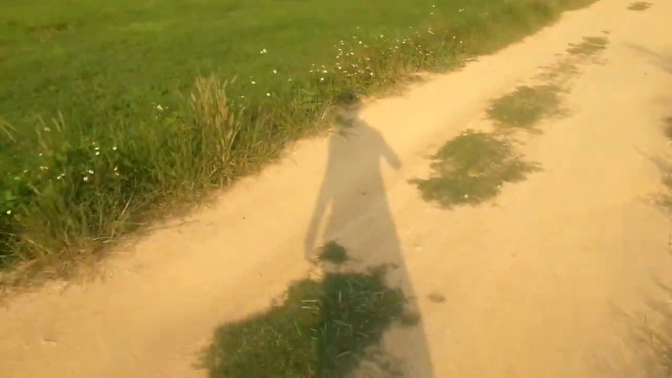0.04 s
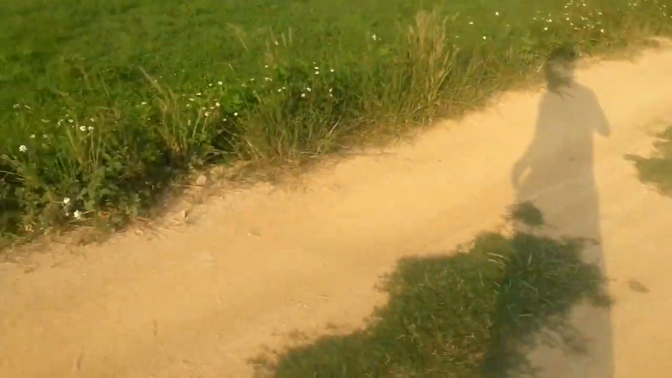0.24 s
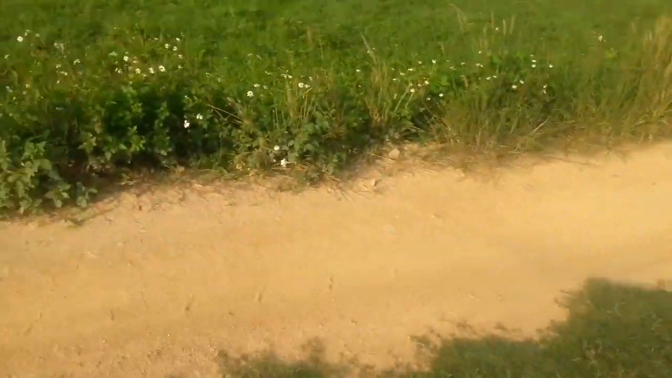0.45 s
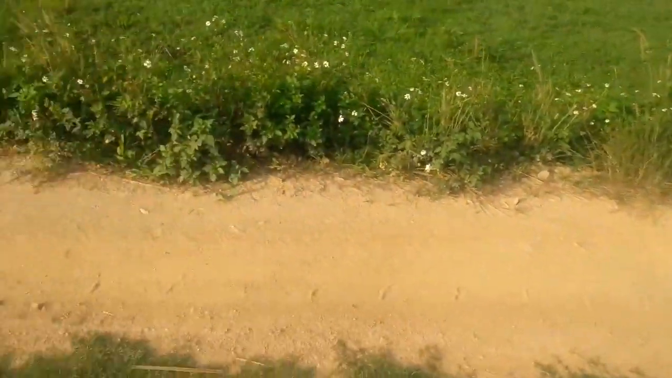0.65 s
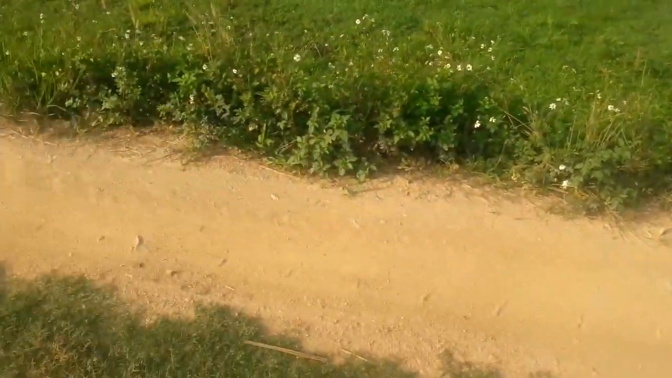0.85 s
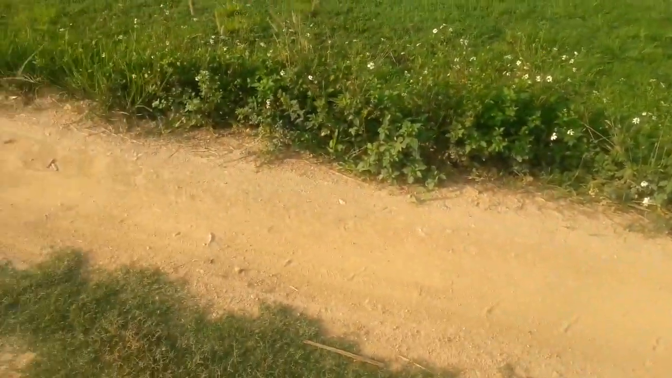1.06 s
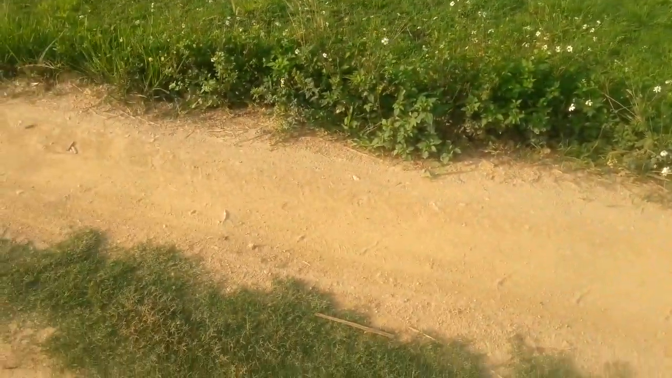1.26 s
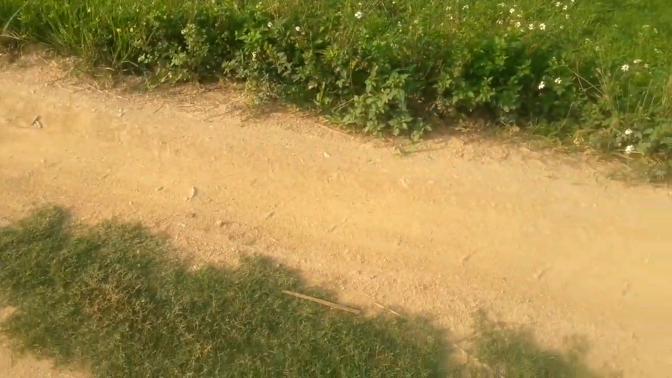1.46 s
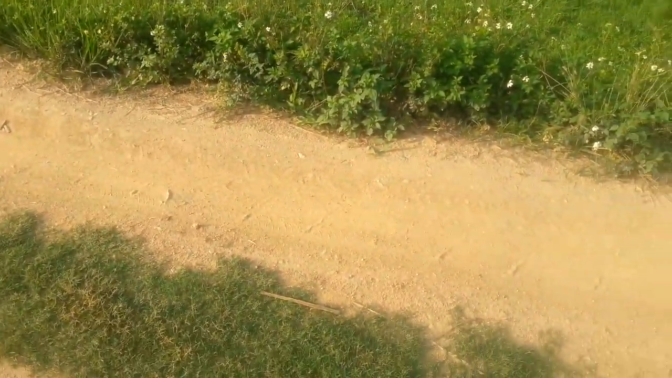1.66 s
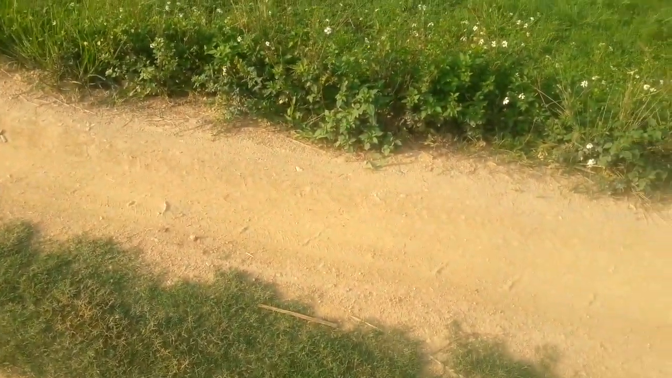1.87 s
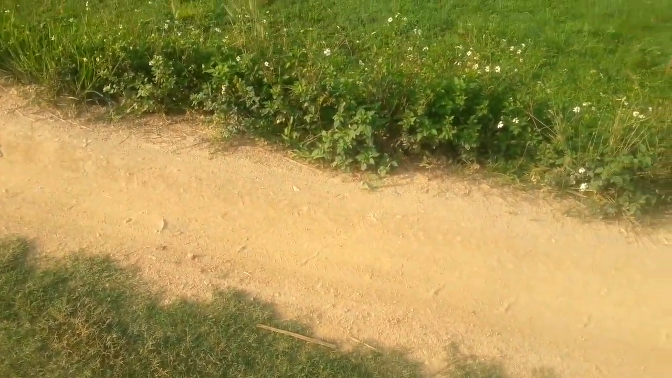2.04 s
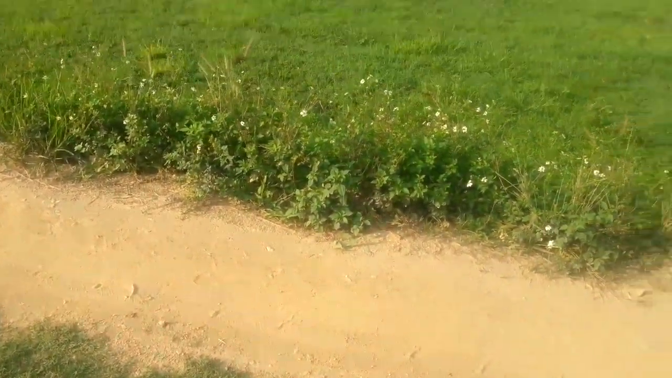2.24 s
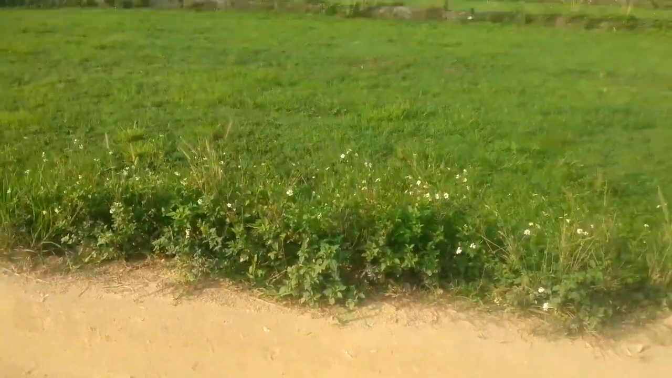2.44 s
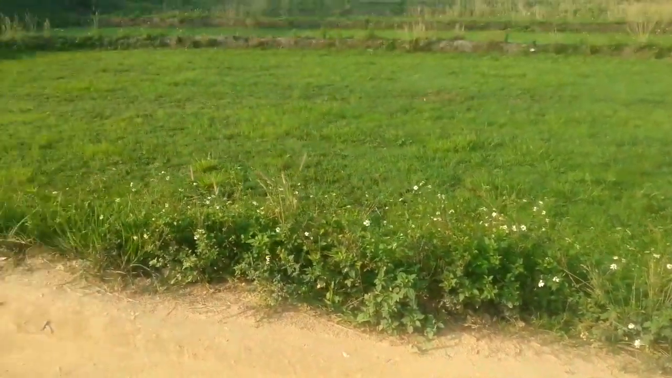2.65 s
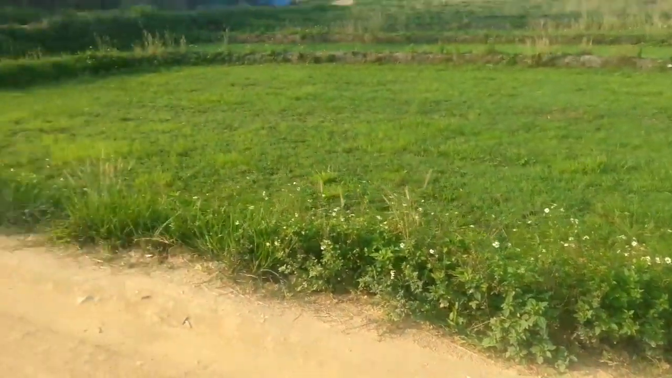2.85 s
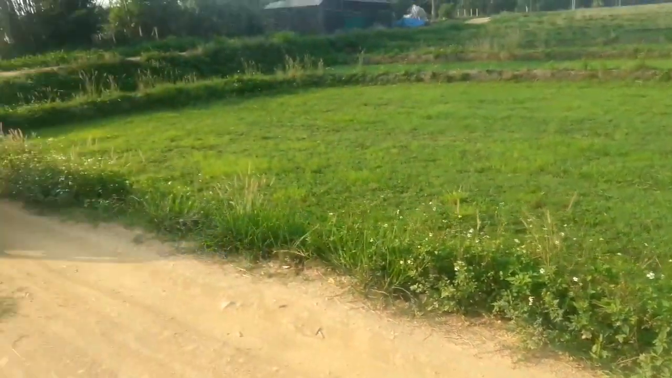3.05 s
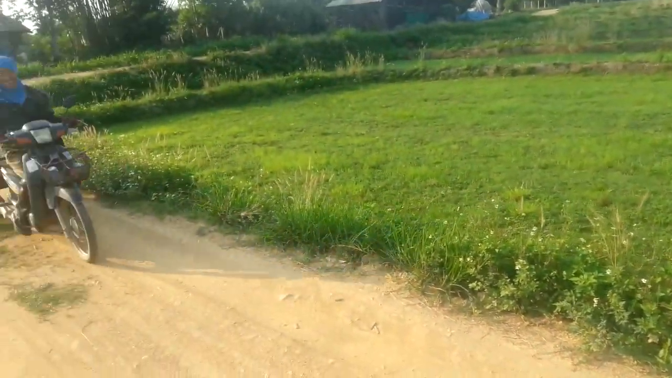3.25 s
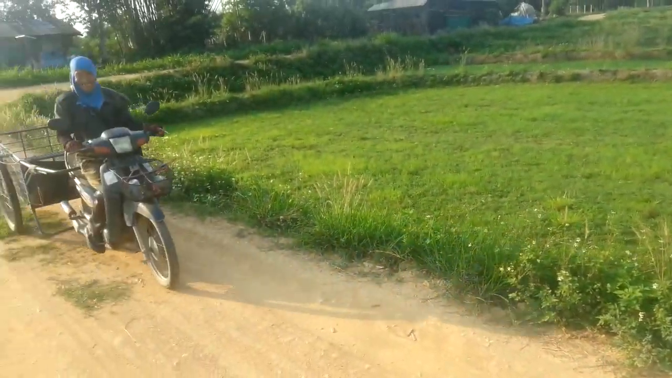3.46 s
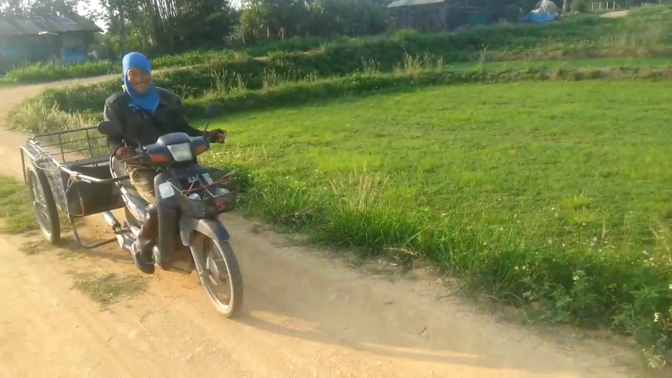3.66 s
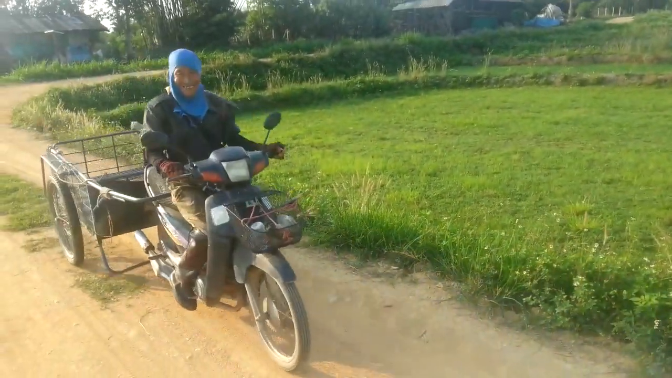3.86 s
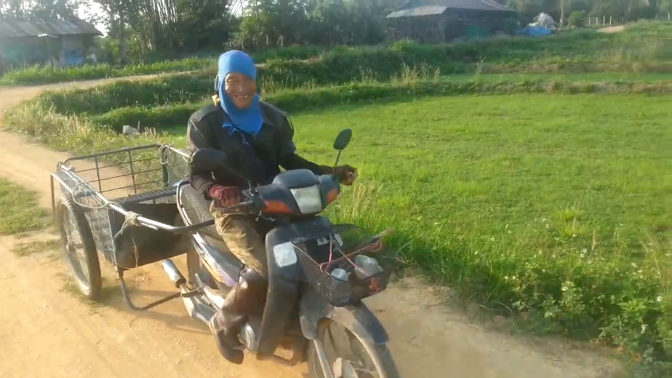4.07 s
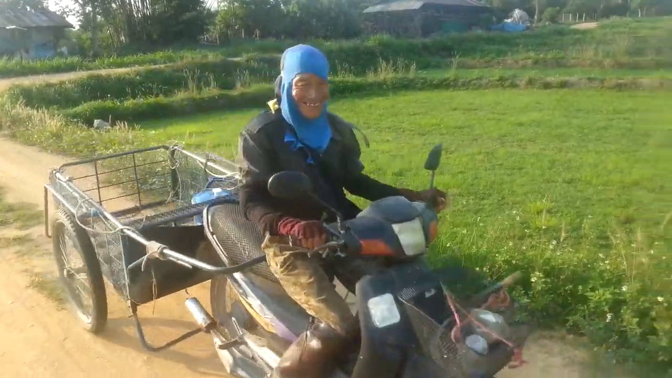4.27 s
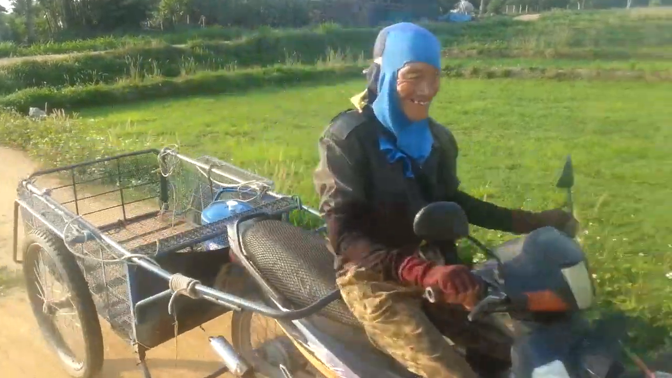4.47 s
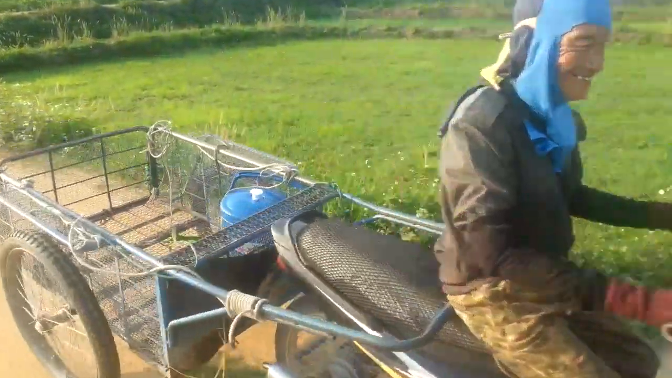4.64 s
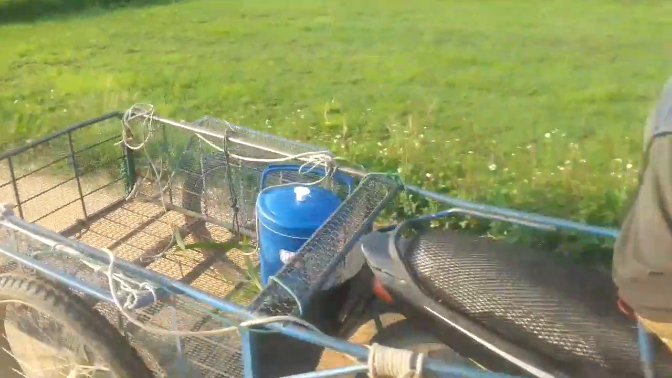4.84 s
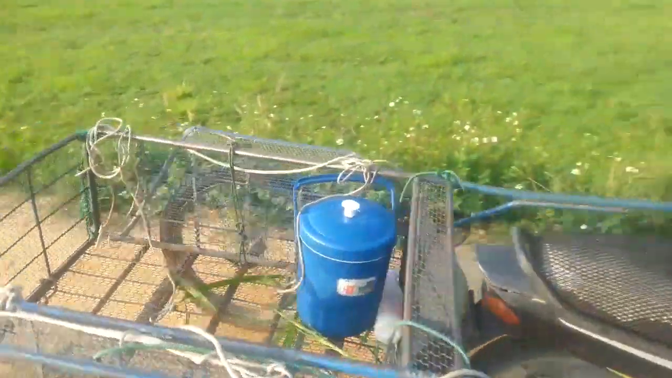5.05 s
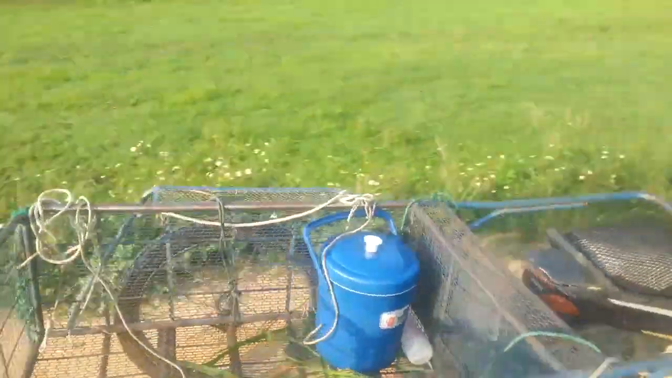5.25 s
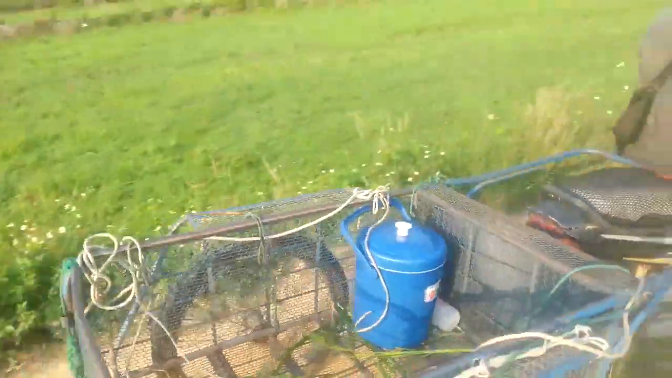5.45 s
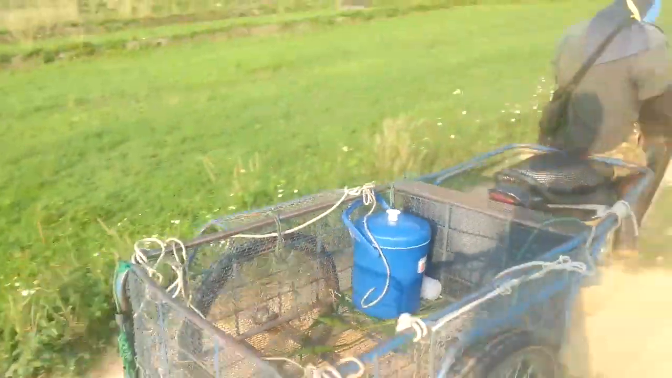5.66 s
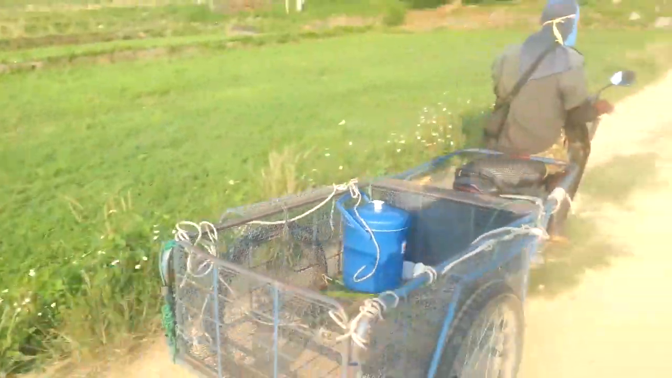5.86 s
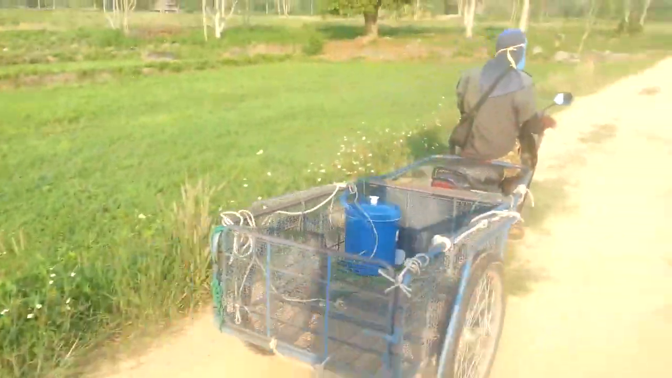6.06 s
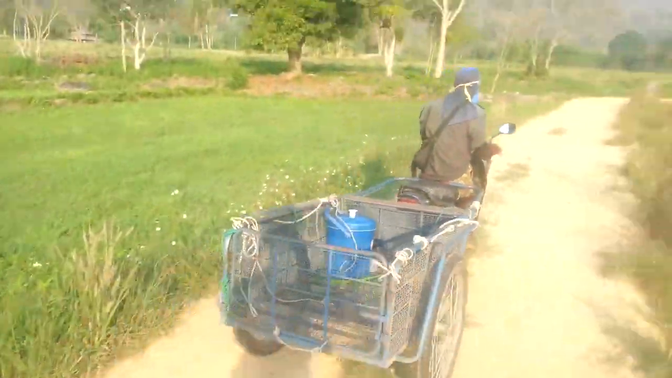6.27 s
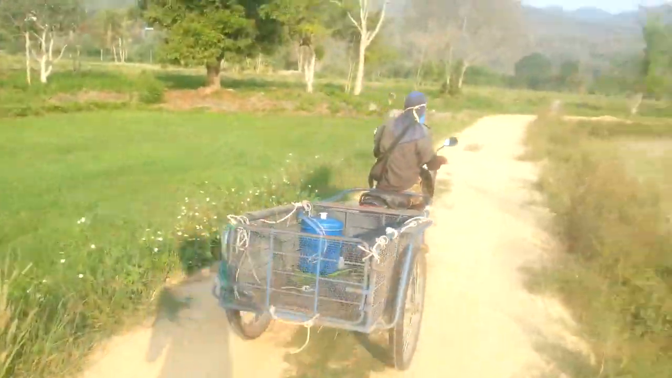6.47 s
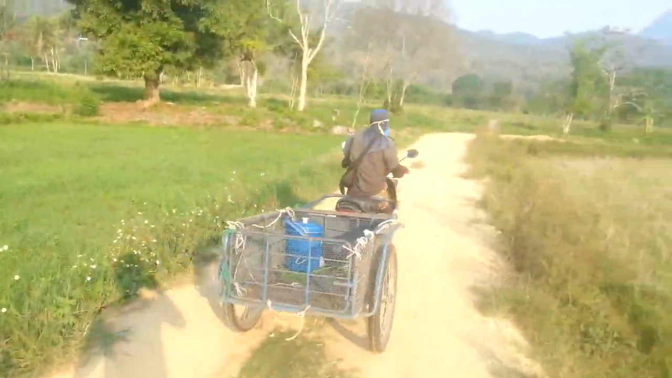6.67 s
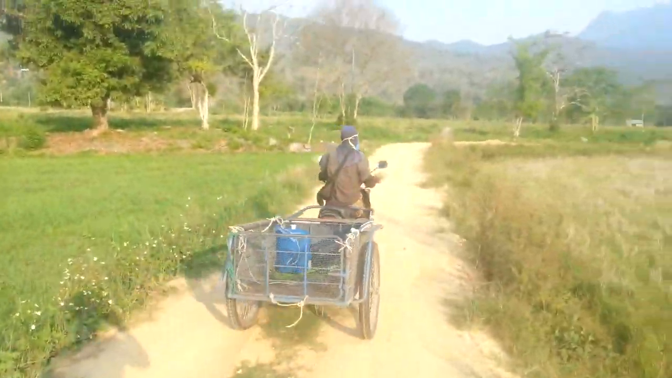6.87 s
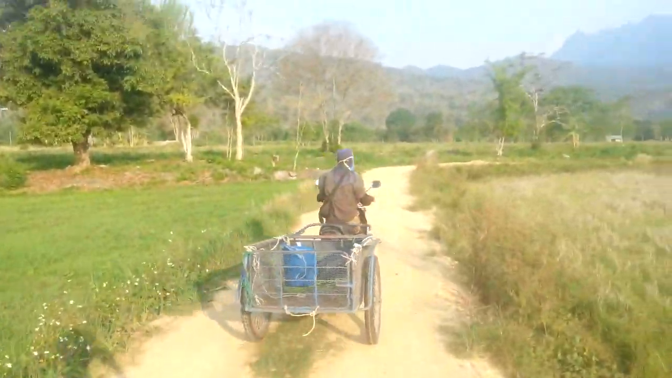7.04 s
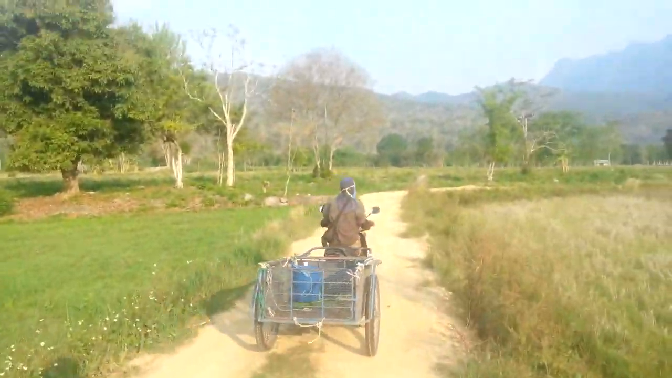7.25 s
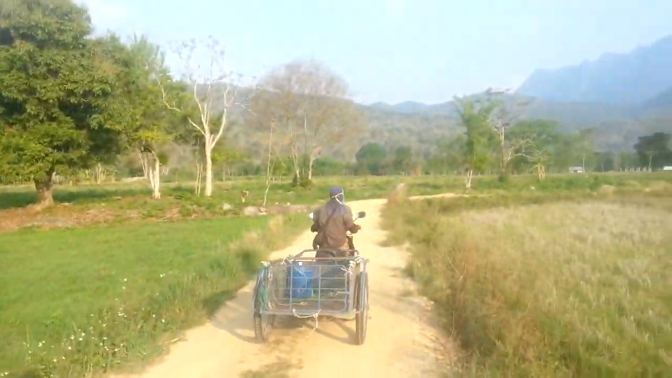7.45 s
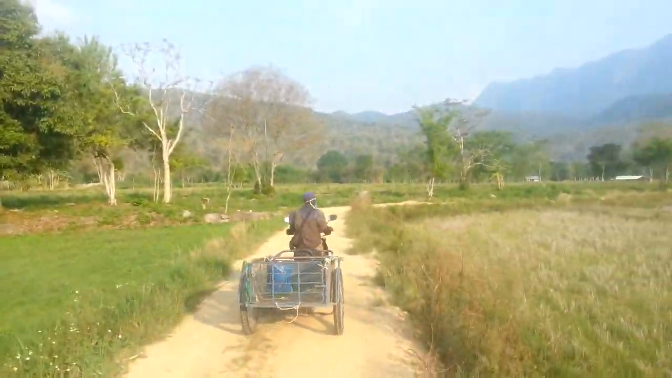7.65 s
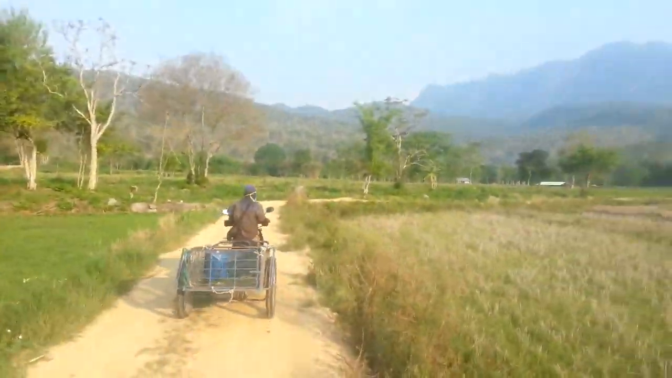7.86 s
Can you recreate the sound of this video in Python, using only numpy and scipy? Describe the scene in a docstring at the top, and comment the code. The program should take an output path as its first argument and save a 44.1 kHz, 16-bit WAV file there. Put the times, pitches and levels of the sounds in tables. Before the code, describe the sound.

Open air beside a dirt track, close handheld stereo microphone, left side stronger. From 0 s a small motorcycle putters quietly some way off, its low exhaust fluttering at a fast, uneven pace. A soft falling swish brushes near the microphone in the first half second, followed by two tiny dry scrapes at about 0.6 and 0.8 s. From 1.5 s tinny, irregular cracks emerge; around 2.4 s the engine picks up and a loose metal part buzzes briefly near 2.8 s. From 3.3 s the wire cart's jolts and chatter join, with rumbling tyres and crunching grit. The bike passes very close at about 5 s, loudest, slightly overloaded, with a sweeping ground-reflection colour. Afterwards the cart rattles brightly from behind until about 6.7 s, while the exhaust turns hollow and throaty. Engine and crunch slowly recede, still popping, with a few last jolts and a slight rise of rolling noise before 7.9 s.

```python
"""On a dirt track, a small motorcycle tows a wire-mesh cart, passes close by and rides off.
On light throttle it fires hard only every third stroke or so: shocks ring the exhaust's steel shell
with a tinny crack, and slugs of gas puff through the silencer. The ground echo sweeps as it passes.
Clicks ringing through wire modes make the cart rattle; filtered noise and dense grains make the tyres
rumble and crunch over grit. A soft swish and two dry scrapes sound near the listener."""
import sys
import numpy as np
from scipy import signal
from scipy.fft import rfft, irfft
from scipy.io import wavfile
from scipy.ndimage import uniform_filter1d

SR = 44100
rng = np.random.default_rng(int(sys.argv[2]) if len(sys.argv) > 2 else 0)


def generate_wav(signal):
    """Clip the signal to [-1, 1] and save it as 16-bit WAV at the path in sys.argv[1]."""
    frames = np.transpose(np.atleast_2d(signal))
    scaled = np.clip(frames, -1, 1) * 32767
    pcm = np.round(scaled).astype(np.int16)
    wavfile.write(sys.argv[1], SR, pcm)


N = 348831
T = np.arange(N) / SR
# the ride: a straight line past the listener; the speed is the one at the moment of passing
SPEED_M_S, GAIN_M_S2, PASSES_S, CLOSEST_M = 2.1, 0.25, 5.07, 1.88


def undb(db):
    """Decibels to gain."""
    return 10 ** (np.asarray(db) / 20)


def curves(table):
    """The columns of a table as one value per sample."""
    s, *columns = np.transpose(table)
    return [np.interp(T, s, c) for c in columns]


def unit(x):
    """Scaled to rms 1."""
    return x / np.sqrt(np.mean(x ** 2))


def steady(x):
    """Scaled to rms 1 over every half second or so."""
    power = np.mean(np.atleast_2d(x) ** 2, axis=0)
    smooth = uniform_filter1d(uniform_filter1d(power, size=SR // 3), size=SR // 4)
    return x / np.sqrt(smooth + 1e-18)


def burst(x, size=260):
    """Each short sound scaled to rms 1 over its first milliseconds."""
    return x / np.sqrt(np.mean(x[..., :size] ** 2, axis=(0, 2), keepdims=True))


def colour(x, points, size=2048):
    """Causal (minimum-phase) filter that follows (Hz, dB) points."""
    hz, db = np.transpose(points)
    log_hz = np.log(np.fft.rfftfreq(size, 1 / SR) + 1)
    log_gain = np.log(undb(np.interp(log_hz, np.log(hz), db)))
    # folding the cepstrum onto positive time makes the response causal
    cepstrum = irfft(log_gain)
    cepstrum[1:size // 2] *= 2
    cepstrum[size // 2 + 1:] = 0
    response = irfft(np.exp(rfft(cepstrum)))[:size // 2]
    response = response.reshape((1,) * (x.ndim - 1) + (-1,))
    return signal.fftconvolve(x, response, axes=-1)[..., :x.shape[-1]]


def ring(x, modes):
    """Resonances (Hz, width Hz, dB) side by side; neighbours swing in opposite phase."""
    total = 0
    for k, (hz, width, db) in enumerate(modes):
        total = total + (-1) ** k * undb(db) * signal.lfilter(*signal.iirpeak(hz, hz / width, SR), x)
    return total


def glide(x, hz, width):
    """One resonance whose centre moves: shift it to 0 Hz, smooth, shift back."""
    turn = np.exp(2j * np.pi * np.cumsum(hz) / SR)
    keep = np.exp(-np.pi * width / SR)
    return 2 * (turn * signal.lfilter([1 - keep], [1, -keep], x / turn)).real


def pair(shape, alike):
    """Left and right noise with a shared part."""
    alike = np.clip(alike, 0, 1)
    shared = np.sqrt(alike) * rng.standard_normal(shape)
    return shared + np.sqrt(1 - alike) * rng.standard_normal((2, *shape))


def grains(rate, spread_db, alike):
    """Random tiny impacts, rate per second, a few far larger than the rest."""
    hits = rng.random(N) < rate / SR
    size = hits * undb(spread_db * np.minimum(rng.exponential(size=N), 4))
    return size * pair((N,), alike)


def delayed(x, seconds):
    """The sound read at a fixed or moving delay."""
    return np.interp(T - seconds, T, x)


def place(times, sounds):
    """Short sounds (.., event, sample) laid out at their times."""
    out = np.zeros((*sounds.shape[:-2], N + SR))
    starts = (np.clip(times, 0, T[-1]) * SR).astype(int)
    for k, i in enumerate(starts):
        out[..., i:i + sounds.shape[-1]] += sounds[..., k, :]
    return out[..., :N]


def rustle(width_hz=1400):
    """A soft dry swish near the listener: noise through two moving resonances, falling in pitch."""
    # path of the swish: [t/s, centre f/Hz, level/dB]
    swish_path = [(0, 3680, -53), (.11, 3620, -44), (.22, 2630, -50.5), (.4, 2200, -47), (.7, 2200, -90)]
    hz, db = curves(swish_path)
    swish = [glide(glide(x, hz, width_hz), hz, width_hz) for x in pair((N,), alike=0.33)]
    return undb(db) * unit(np.array(swish))


def scuffs(edge_s=0.0038):
    """Two brief dry scrapes near the listener: coloured grains behind a soft-edged gate."""
    # the scrapes: [t/s, length less one edge/s, gate level/dB]
    scrape_times = [(0.585, 0.0035, -29.5), (0.78, 0.032, -28)]
    # spectrum of a scrape: [f/Hz, relative level/dB]
    scrape_spectrum = [(300, -26), (900, -7), (1400, -4.5), (2400, -12), (4500, -20.5), (12000, -45)]
    gate = 0
    for s, length, db in scrape_times:
        to_edge = np.minimum(T - s, s + length + edge_s - T)
        gate = gate + undb(db) * np.clip(to_edge / edge_s, 0, 1)
    return gate * unit(colour(grains(rate=6100, spread_db=3.0, alike=0.67), scrape_spectrum))


def ride():
    """Metres past the listener along the track, and metres from the listener, gathering speed."""
    t = T - PASSES_S
    along = SPEED_M_S * t + GAIN_M_S2 * t ** 2 / 2
    return along, np.hypot(along, CLOSEST_M)


def over_ground(x, echo_gain=.72):
    """Direct sound plus its echo off the track; the longer path sets a sweeping delay."""
    # how much further the echo travels: [t/s, extra path/m]
    echo_detour = [(0, .1), (2.3, .17), (3.3, .275), (4.0, .36), (4.4, .395), (4.9, .66), (5.3, .55),
                   (5.85, .385), (6.5, .25), (7.9, .13)]
    detour_m, = curves(echo_detour)
    return x + echo_gain * delayed(x, detour_m / 343)


def track(near_db, grit_db, roll_db=-5, crunch_db=1):
    """Uneven earth rumbles through wheels and frame; the tyres crush loose grit."""
    # rumble of wheels and frame: [f/Hz, relative level/dB]
    tyre_spectrum = [(25, -12.5), (60, -18.5), (110, -17.5), (250, 9.5), (700, 2.5), (950, -14),
                     (2500, -57), (8000, -90)]
    # crunch of loose grit: [f/Hz, relative level/dB]
    grit_spectrum = [(1000, 13.5), (2700, 9.5), (3500, 8.5), (4300, 15.5), (6500, 5.5), (10000, 4),
                     (12500, -5.5), (15000, -18)]
    bump_db = 1.8 * np.interp(T, np.linspace(0, T[-1], 240), rng.standard_normal(240))
    roll = unit(over_ground(colour(rng.standard_normal(N), tyre_spectrum)))
    crunch = unit(colour(grains(rate=12000, spread_db=2.0, alike=0.018), grit_spectrum))
    return roll * undb(near_db + roll_db + bump_db) + crunch * undb(grit_db + crunch_db + bump_db / 2)


def shaking(near_db, rise_s=0.000052, decay_s=0.077, small_db=1, spread_db=3, count=32):
    """How hard the cart shakes: big jolts and small random ones, each sudden and dying away."""
    # big jolts of the cart: [t/s, relative peak level/dB]
    big_jolts = [(1.7943, -25.5), (3.39, -17.5), (3.655, -19), (3.8237, -16), (3.9225, -11.5),
                 (4.0814, -14), (4.467, -9.5), (4.5714, -9), (4.7062, -14), (4.853, -7.5), (4.888, -16),
                 (5.26, -10.5), (5.3823, -10), (5.42, -10.5), (5.512, -14.5), (5.9345, -9), (6.0795, -9),
                 (6.1795, -12), (6.3235, -13.5), (6.479, -14), (6.572, -19), (6.6253, -11), (6.922, -20.5),
                 (7.548, -21.5), (7.682, -16), (7.8565, -12)]
    when, size = rng.random(count) * T[-1], rng.standard_normal(count)
    small_jolts = np.column_stack([when, np.interp(when, T, near_db) + small_db + spread_db * size])
    s, db = np.vstack([big_jolts, small_jolts]).T
    age = np.arange(SR // 2) / SR
    envelope = (1 - np.exp(-age / rise_s)) * np.exp(-age / decay_s)
    # overlapping jolts add as power
    return np.sqrt(place(s, (undb(db)[:, None] * envelope) ** 2))


def cart(near_db, behind, rear_hz=7200, rear_width_hz=2600, mesh_db=-6, wire_db=-9, count=60):
    """Jolts set mesh and frame chattering: clicks ring many short wire modes, brighter from behind."""
    # spectrum of the mesh: [f/Hz, relative level/dB]
    mesh_spectrum = [(300, -2), (900, 11.5), (1600, 14.5), (2600, 17), (3600, 9), (6500, 5.5), (9000, -1.5),
                     (12000, -7.5), (15000, -38)]
    clicks = grains(rate=3000, spread_db=2.5, alike=.2)
    wire_hz = np.geomspace(1000, 13000, count) * rng.uniform(.92, 1.08, count)
    wires = [(hz, 50 + hz / 60, 0) for hz in wire_hz]
    chatter = colour(unit(clicks) + undb(wire_db) * unit(ring(clicks, wires)), mesh_spectrum)
    rear = behind * ring(chatter, [(rear_hz, rear_width_hz, 0)])
    return undb(mesh_db) * shaking(near_db) * unit(chatter + rear)


def buzz(s, throb_db=3):
    """A loose metal part rattles with the strokes on the way in: grains through a doubled resonance."""
    # rattle of the loose part, before its throb: [t/s, level/dB]
    rattle_level = [(1.5, -65), (2.3, -51), (2.75, -32.5), (3.0, -34.5), (3.2, -46), (3.6, -81)]
    # its ring: [f/Hz, width/Hz, level/dB]
    rattle_mode = [(2437, 270, 0)]
    db, = curves(rattle_level)
    phase = np.interp(T, s, np.arange(len(s)))
    hits = grains(rate=900, spread_db=3.5, alike=0.53)
    chatter = ring(ring(hits, rattle_mode), rattle_mode)
    return unit(chatter) * undb(db + throb_db * np.cos(2 * np.pi * phase))


def clatter(s, throb_db=3):
    """Valve gear and chain tick away as coloured grains, busiest twice in each stroke."""
    # spectrum of valve gear and chain: [f/Hz, relative level/dB]
    gear_spectrum = [(200, -41.5), (600, 18.5), (740, 5.5), (910, 15), (1300, 14), (1850, 14.5),
                     (2150, -0.5), (2450, -1), (3500, 1.5), (6000, -7.5), (14000, -44)]
    phase = np.interp(T, s, np.arange(len(s)))
    ticks = colour(grains(rate=1500, spread_db=3.0, alike=1.0), gear_spectrum)
    return ticks * undb(throb_db * np.cos(4 * np.pi * phase))


def strokes(first_stroke_s=.0405, strokes_per_firing=3.2, miss_db=-21, second_db=3.5, weak_db=-4.0,
            refill_db=1.5, scatter_db=1.43, uneven_db=1.3):
    """Each stroke's time, crack dB, puff dB, hard and missed flags; hard about every third stroke."""
    # engine speed: [t/s, strokes per second/Hz]
    engine_speed = [(0.0, 33.64), (1.0, 34.42), (2.2, 32.17), (2.4, 33.85), (2.6, 37.44), (2.8, 36.65),
                    (3.6, 38.98), (3.8, 40.34), (4.2, 39.52), (4.6, 40.98), (4.8, 39.78), (5.2, 39.86),
                    (5.6, 38.76), (6.2, 42.1), (6.5, 41.85), (6.75, 41.55), (7.0, 41.85), (7.8, 41.76)]
    # hard firings at set times, faint and loud, that pin the firing pattern:
    # [t/s, crack level/dB, crack level of following stroke/dB]
    set_firings = [(.131, -36.5, -55), (.249, -30, -55), (.365, -34, -52), (.481, -47, -55),
                   (.631, -39, -55), (.748, -35, -55), (.925, -36, -59), (1.039, -38.5, -55),
                   (1.156, -37, -57), (1.303, -34.5, -55), (1.393, -31.5, -60), (1.511, -26.5, -58),
                   (1.722, -26, -55), (1.935, -25.5, -53), (2.027, -35, -55), (2.241, -24, -55),
                   (2.306, -21.5, -28), (2.563, -17, -50), (2.698, -30, -24), (2.807, -20.5, -31),
                   (2.861, -21, -42), (2.916, -23.5, -44), (3.395, -17, -22.5), (3.497, -15, -18),
                   (3.6, -11.5, -45), (3.829, -13, -12.5), (3.925, -13, -18), (4.203, -11.5, -37),
                   (4.278, -12.5, -14.5), (4.378, -11, -24), (4.55, -10, -35), (4.798, -12, -15),
                   (4.924, -17, -12.5), (5.023, -9.5, -26), (5.075, -14, -11.5), (5.274, -8, -22),
                   (5.351, -13, -30), (5.427, -16.5, -19.5), (5.53, -13.5, -45), (5.581, -15.5, -24),
                   (5.658, -12, -27), (5.735, -14.5, -17.5), (5.934, -21, -17), (6.082, -17, -15.5),
                   (6.415, -14.5, -16), (6.845, -16, -22), (6.918, -15, -21), (7.347, -16.5, -19.5),
                   (7.467, -17, -19), (7.539, -16, -20), (7.612, -16, -23), (7.729, -17.5, -22),
                   (7.873, -14, -28)]
    # all other hard firings, before scatter: [t/s, crack level/dB, crack level of following stroke/dB]
    crack_levels = [(0, -62, -60.5), (1.3, -36, -61), (2.15, -26, -54), (2.4, -19, -58), (3.0, -22, -30),
                    (3.25, -17, -53), (4.1, -12.5, -24.5), (5.45, -14.5, -10.5), (5.8, -18, -18.5),
                    (6.55, -15.5, -19.5), (7.9, -17, -24)]
    rate, = curves(engine_speed)
    turns = np.cumsum(rate) / SR
    turns -= np.interp(first_stroke_s, T, turns)
    k = np.arange(int(turns[-1]) + 1)
    s = np.interp(k, turns, T)

    # further hard firings are spread evenly between the set ones
    set_s, *set_db = np.transpose(set_firings)
    pinned = np.abs(s - set_s[:, None]).argmin(axis=1)
    firings = []
    for a, b in zip([0, *pinned], pinned):
        gaps = max(1, round((b - a) / strokes_per_firing))
        firings.append(np.linspace(a, b, gaps + 1))
    firings = np.unique((np.concatenate(firings) + .5).astype(int))
    last = firings[np.searchsorted(firings, k, side="right") - 1]
    since = np.minimum(k - last, 3)

    first, following = (np.interp(s, T, db) + uneven_db * rng.standard_normal(len(s))
                        for db in curves(crack_levels))
    first[pinned], following[pinned] = set_db
    # a hard firing, a second one, mostly weaker but at times stronger,
    # then misses while fresh charge builds up again
    miss = first[last] + miss_db
    crack_db = np.choose(since, [first[last], following[last], miss, miss])
    fired = crack_db > first[last] - 14
    idle = np.minimum(k - np.maximum.accumulate(k * fired), 2)
    puff_db = np.array([second_db, weak_db, refill_db])[idle] * (since > 0)
    puff_db = puff_db + scatter_db * rng.standard_normal(len(s))
    return s, crack_db, puff_db, since == 0, idle == 1


def exhaust(s, puff_db, hard, missed, pipe_db, nearness, hard_s=0.00004, soft_s=0.00032,
            soft_lag_s=0.00063, rebound_s=0.00952, rebound_db=-11, piston_s=0.00842,
            piston_rise_s=0.00025, piston_body_db=-5, piston_pipe_db=5, swirl_db=-42,
            hum_width_hz=50, overtone_width_hz=55):
    """Strokes push gas through silencer and air box: abrupt if hard, otherwise late and soft."""
    # silencer body, heard all round: [f/Hz, relative level/dB]
    silencer_body = [(90, -52), (165, -12), (200, -8.5), (245, -13), (305, 8), (365, 7), (450, 4), (570, 0),
                     (650, -5), (717, -2.5), (800, -14.5), (950, -15), (1500, -29), (3000, -64)]
    # open tailpipe, heard from the side and from behind: [f/Hz, relative level/dB]
    tailpipe_mouth = [(90, -46.5), (160, 8), (200, -0.5), (290, 10.5), (390, -18), (470, 4), (590, -2),
                      (690, 21), (770, 17.5), (860, 10), (956, 17.5), (1100, -20.5), (3000, -76)]
    # drone of the air box, strongest close by: [f/Hz, width/Hz, relative level/dB]
    airbox_modes = [(441.6, 30, 8), (489, 127, 8.5), (563, 58, 9)]
    # drifting hum of the silencer, relative levels: [t/s, hum f/Hz, hum level/dB,
    # overtone f/Hz, overtone level/dB]
    silencer_hum = [(0, 356, -12, 704, 5), (.45, 378, -22, 717, 15), (1.3, 315, -22, 697, 5.5),
                    (2.6, 409, 3, 688, 10), (3.1, 404, 0, 660, -12), (3.8, 340, -0.5, 770, -1),
                    (4.6, 302, 0, 723, -4), (5.5, 295, 12.5, 700, -1), (5.95, 336, 11.5, 700, 8),
                    (6.35, 317, 2.5, 797, 0), (6.7, 330, -1, 765, -10), (7.9, 376, 13, 740, 12)]
    t = np.arange(2048) / SR

    def slug(rise):
        """A push of gas that is weaker in peak the slower it rises."""
        return t / rise * np.exp(-t / rise) * hard_s / rise

    push = slug(np.where(hard, hard_s, soft_s)[:, None])
    swirl = undb(swirl_db) * rng.standard_normal(push.shape) * np.exp(-t / .02)
    flow = place(s + soft_lag_s * ~hard, (push + swirl) * undb(puff_db)[:, None])
    # the gas column rebounds once after each stroke
    flow = flow + undb(rebound_db) * delayed(flow, rebound_s)
    # unburnt charge waits for the piston to sweep it out
    swept = place(s + piston_s, slug(piston_rise_s) * missed[:, None])
    body = flow + undb(piston_body_db) * swept
    pipe = flow + undb(piston_pipe_db) * swept

    hum_hz, hum_db, overtone_hz, overtone_db = curves(silencer_hum)
    hum = undb(hum_db) * glide(body, hum_hz, hum_width_hz)
    overtone = undb(overtone_db) * glide(body, overtone_hz, overtone_width_hz)
    mouth = undb(pipe_db) * colour(pipe, tailpipe_mouth)
    airbox = nearness ** 3 * ring(body, airbox_modes)
    boom = colour(body, silencer_body) + hum + overtone + mouth + airbox
    return signal.sosfilt(signal.butter(2, 110, "high", fs=SR, output="sos"), boom)


def cracks(s, crack_db, hard, spit_db, tilt_db, top_db, weak_spit_db=-5, gas_db=-2, shock_over_blow=3.4,
           return_s=.0058, return_db=-12, tail_db=-20, mode_scatter_db=2.2):
    """Firing shocks ring the steel shell in varying mixes, knock again up the pipe, and spit gas."""
    # ring of the exhaust's steel shell: [f/Hz, width/Hz, relative level/dB]
    shell_modes = [(1500, 110, -17), (2290, 130, -14), (2470, 130, -2), (2680, 350, -6), (2891, 100, 1),
                   (3100, 150, -10), (4250, 450, -14), (4748, 90, -6)]
    # spectrum of the spitting gas: [f/Hz, relative level/dB]
    gas_spectrum = [(300, -9), (900, 3), (1300, -4), (1900, -8), (3050, 0), (3600, -12), (4800, -1),
                    (7500, -5), (10500, -4), (13500, -10), (15000, -28)]
    t = np.arange(2048) / SR
    decay = np.exp(-t / .0016) + undb(tail_db) * np.exp(-t / .013)
    blow = decay * (1 - np.exp(-t / .0005)) ** 2
    front = shock_over_blow * (t == t[45])  # single-sample shock, 1 ms in
    knock = undb(return_db) * np.interp(t - return_s, t, blow)
    push = (blow + knock) * pair((len(s), len(t)), alike=0.95) + front

    shell = 0
    for mode in shell_modes:
        hz = mode[0]
        # each mode radiates in its own direction
        tilt = np.interp(s, T, tilt_db) * np.interp(hz, [1500, 2400, 2900, 4700], [0, 1, -1, 0])
        top = np.interp(s, T, top_db) * (hz > 4000)
        mode_db = tilt + top + mode_scatter_db * rng.standard_normal(len(s))
        # the shell's wall passes only the band around each mode
        wall = signal.lfilter(*signal.iirpeak(hz, 2, SR), push)
        shell = shell + undb(mode_db)[:, None] * ring(wall, [mode])

    gas_noise = blow * pair((len(s), len(t)), alike=0.12)
    gas = burst(colour(gas_noise + front / 2, gas_spectrum))
    gas_level = undb(gas_db + np.interp(s, T, spit_db) + weak_spit_db * ~hard)[:, None]
    return place(s, (burst(shell) + gas_level * gas) * undb(crack_db)[:, None])


def scene(clatter_db=3, far_gear_db=-51, far_grit_db=-47, pipe_front_db=-70, pipe_side_db=-21.5,
          pipe_rear_db=-1):
    """Engine, cart and tyres reach two microphone ports; scrapes and a swish sound close to them."""
    # exhaust level, before aim and port colour: [t/s, level/dB]
    exhaust_level = [(0.0, -57), (0.02, -36), (1.03, -31), (2.55, -28.5), (2.64, -27), (3.8, -22),
                     (4.29, -26.5), (4.99, -17.5), (5.35, -25), (6.09, -23), (7.68, -27), (7.9, -28)]
    # basic levels of running gear and tyres, and of the grit: [t/s, gear level/dB, grit level/dB]
    rolling_level = [(0.0, -47.5, -55), (2.42, -38.5, -45.5), (2.9, -36.5, -38.5), (3.4, -34.5, -38.5),
                     (3.94, -29.5, -40), (4.42, -27.5, -34.5), (4.69, -29.5, -43), (5.08, -31, -32.5),
                     (5.41, -29, -32.5), (5.7, -31, -43.5), (6.2, -33.5, -37), (7.35, -38.5, -60),
                     (7.9, -29, -38)]
    # gas spit against the shell's ring, before its trims: [t/s, level/dB]
    spit_level = [(0, -14), (2.3, -15), (2.4, -7), (3.25, -6.5), (3.7, -8), (4.2, -8.5), (5.3, -8.5),
                  (6.5, -6.5), (7.9, -9.5)]
    # the shell turns its sides to the listener:
    # [t/s, lift near 2.4 kHz and equal cut near 2.9 kHz/dB, top modes/dB]
    shell_aspect = [(0, -4, -3), (1.6, -1.5, -2), (2.55, 3, 2), (3.0, 1, 7), (3.5, -3.5, 9), (4.3, -2, 3),
                    (5.1, 0, 3), (6.5, 0, -2), (7.9, -2, -9)]
    # the ports swing round to follow: [t/s, left minus right level/dB, right port lag/ms]
    port_aim = [(0, -5, 0.41), (1.8, -5.5, 0.37), (2.5, -6, 0.39), (3.5, -6.5, .2), (4.3, -6, 0.0081),
                (5.2, -6.5, -0.098), (7.9, -6.5, -0.07)]
    along, metres = ride()
    exhaust_db, = curves(exhaust_level)
    gear_db, loose_db = curves(rolling_level)
    spit_db, = curves(spit_level)
    tilt_db, top_db = curves(shell_aspect)
    pan_db, lag_ms = curves(port_aim)

    # a faint wash of rolling noise remains even from afar
    near_db = 10 * np.log10(undb(gear_db) ** 2 + undb(far_gear_db) ** 2)
    grit_db = 10 * np.log10(undb(loose_db) ** 2 + undb(far_grit_db) ** 2)
    # the tailpipe points backwards
    facing = along / metres
    pipe_db = np.interp(facing ** 3, [-1, 0, 1], [pipe_front_db, pipe_side_db, pipe_rear_db])

    s, crack_db, puff_db, hard, missed = strokes()
    boom = exhaust(s, puff_db, hard, missed, pipe_db, CLOSEST_M / metres)
    boom = steady(over_ground(boom)) * undb(exhaust_db)
    gear = unit(np.array([over_ground(x) for x in clatter(s)])) * undb(near_db + clatter_db)
    engine = boom + gear + cracks(s, crack_db, hard, spit_db, tilt_db, top_db)
    rattle = cart(near_db, np.maximum(facing, 0) ** 4)
    left, right = engine + rattle + track(near_db, grit_db) + buzz(s)
    aimed = np.array([left, delayed(right, lag_ms / 1000)]) * undb(np.array([pan_db, -pan_db]) / 2)
    return aimed + scuffs() + rustle()


def record(dry, top_hz=15000):
    """Each port adds its colour, peaks beyond full scale clip, the top is cut."""
    # the two ports differ in colour: [f/Hz, left minus right level/dB]
    port_colour = [(100, 6.5), (700, 7), (1200, 6.5), (1800, 4.5), (2400, -6), (3000, 1.5), (3800, 0),
                   (4700, 4), (6500, 9.5), (9000, 10.5), (14000, 6)]
    ports = []
    for x, side in zip(dry, (1, -1)):
        ports.append(colour(x, [(hz, side * db / 2) for hz, db in port_colour]))
    top_cut = signal.ellip(8, .2, 70, top_hz, fs=SR, output="sos")
    return signal.sosfilt(top_cut, np.clip(np.array(ports), -1, 1))


dry = scene()
out = record(dry)
generate_wav(out)
```